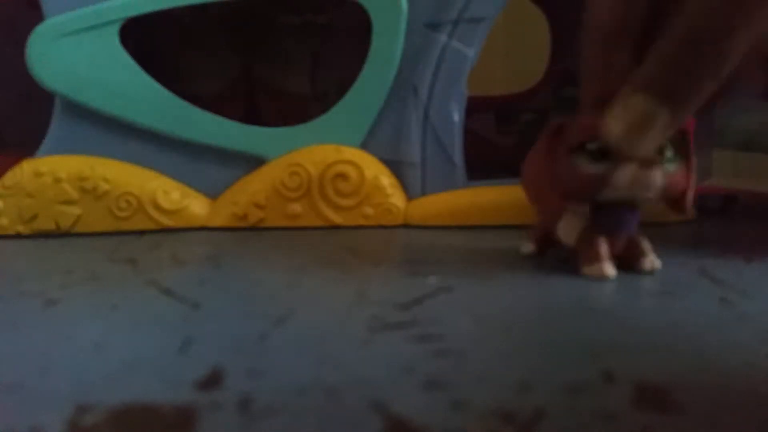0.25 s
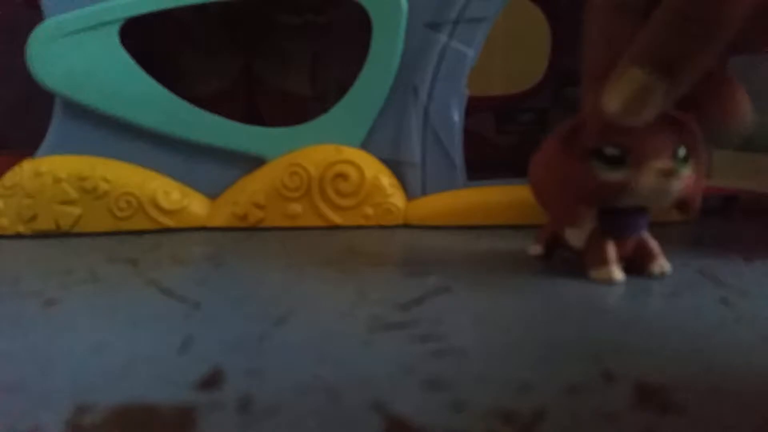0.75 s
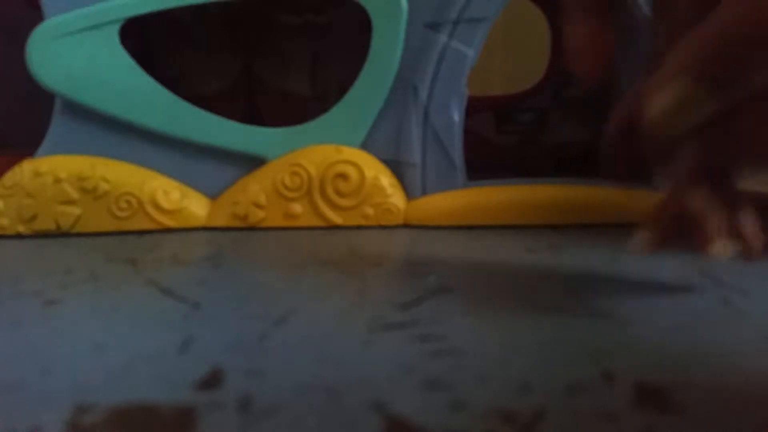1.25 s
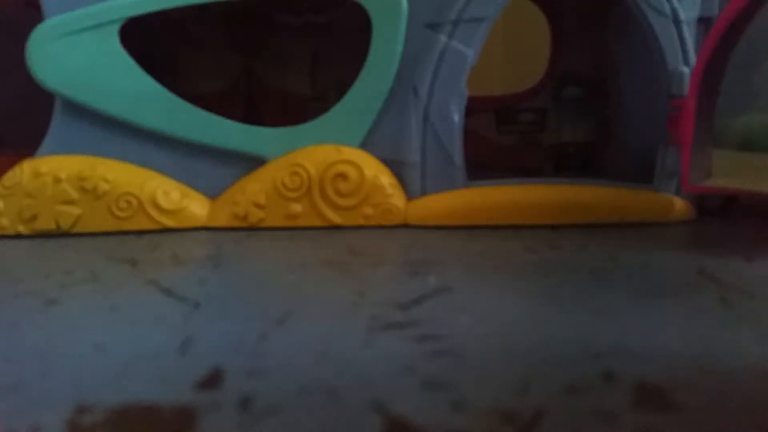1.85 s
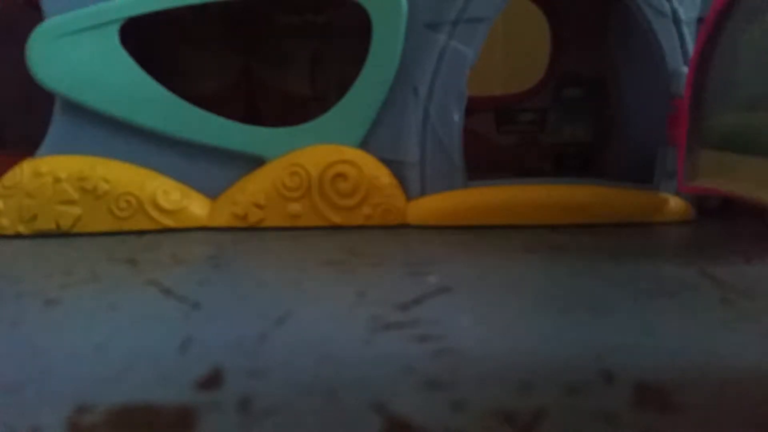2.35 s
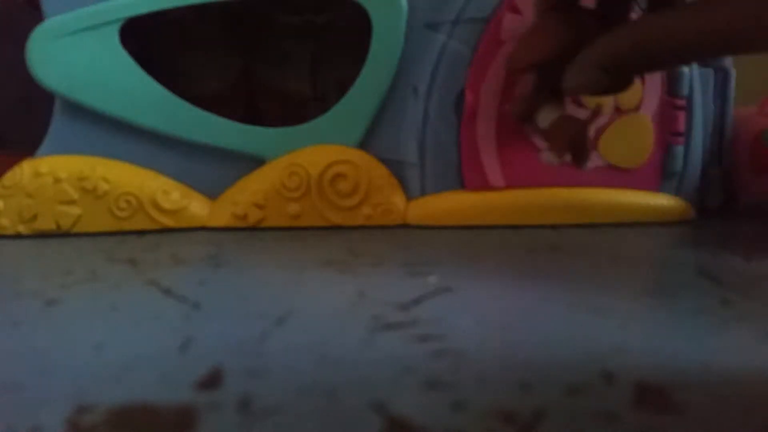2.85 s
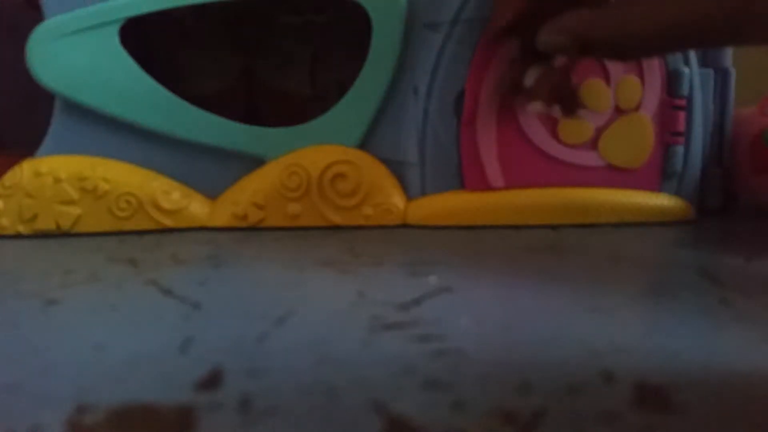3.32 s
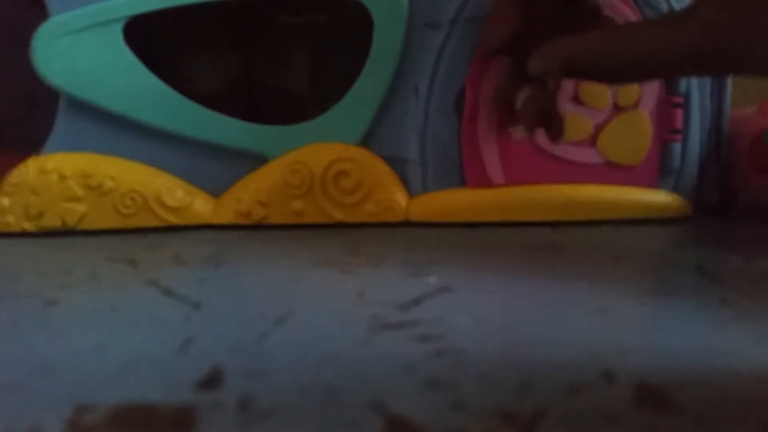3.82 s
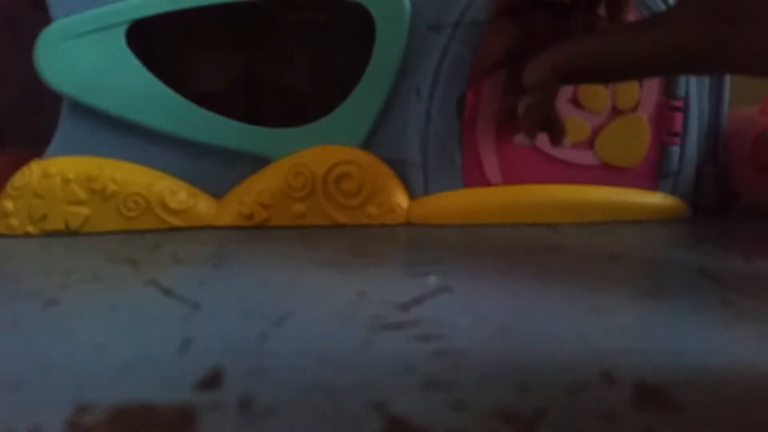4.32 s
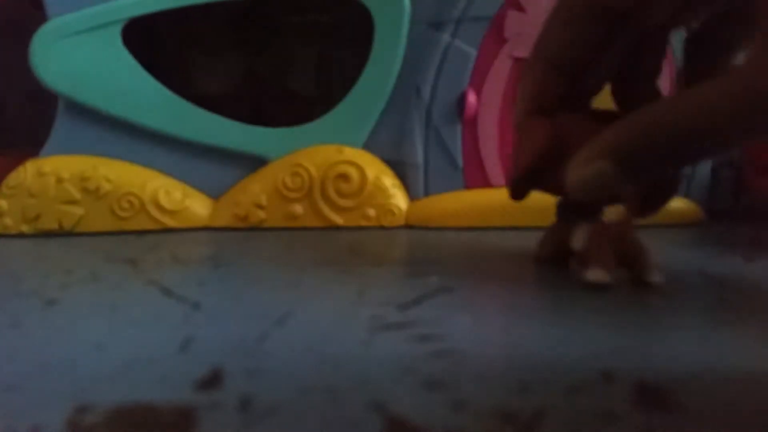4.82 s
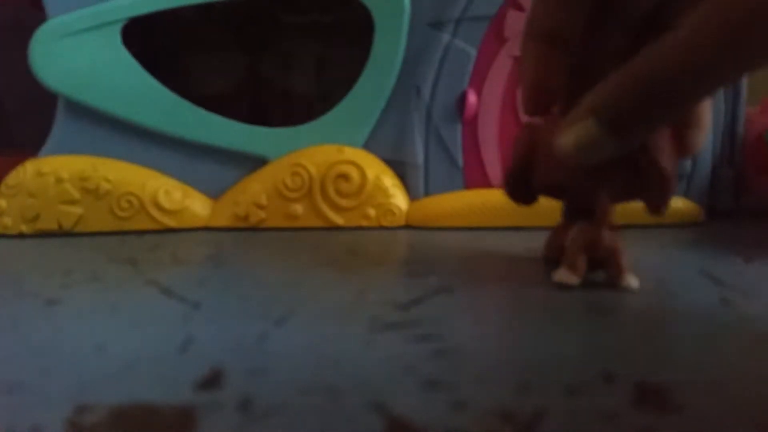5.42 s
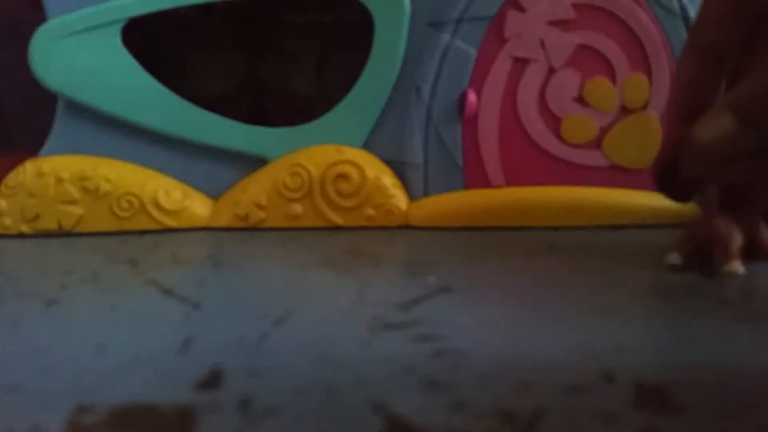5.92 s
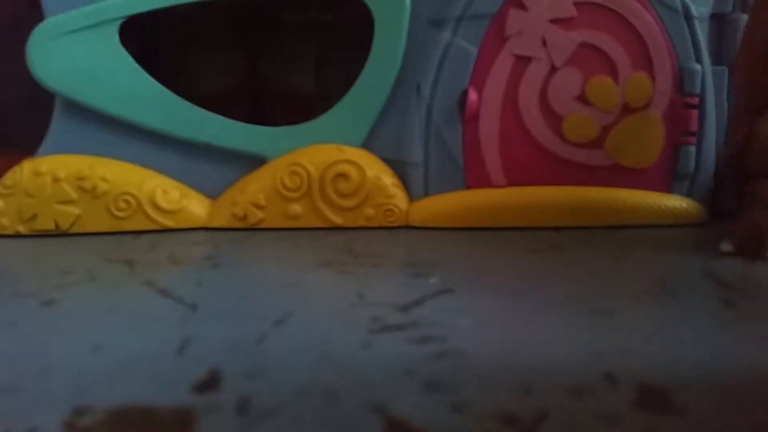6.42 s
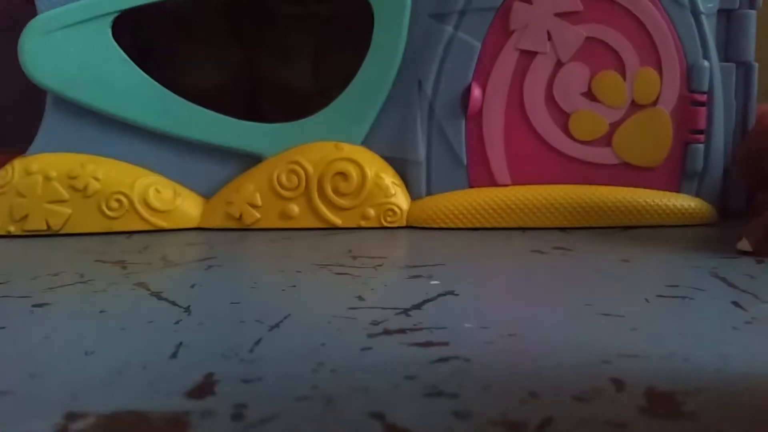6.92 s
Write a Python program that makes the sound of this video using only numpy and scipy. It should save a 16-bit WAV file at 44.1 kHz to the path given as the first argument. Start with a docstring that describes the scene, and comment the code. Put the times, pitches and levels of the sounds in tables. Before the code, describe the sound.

A small plastic toy figure is tapped down on a hollow board, then moved away with soft scrapes. A plastic playhouse door clacks shut and is knocked, sharply around the middle. The figure lands and rocks in a quickening, fading patter, then clicks and steps away. Very close stereo microphone, short room tail, quiet indoor air, and faint hiss mostly at left that swells at the end.

```python
"""Small plastic figures are set down, knocked, rocked and dragged on a hollow board close to two ports.
Each contact rings the board's low modes and the toys' short shell modes, with noise cracks and a short room tail.
A rocking toy adds blunt jolts; sliding strokes shake the same modes and rustle.
Filtered noise gives the room air, its rumble and a mostly left hiss around 4 kHz that swells at the end;
a wavering sine gives a faint low hum."""
import sys
import numpy as np
from scipy import signal
from scipy.fft import rfft, irfft, next_fast_len
from scipy.io import wavfile
from scipy.ndimage import map_coordinates

SR = 44100
rng = np.random.default_rng(int(sys.argv[2]) if len(sys.argv) > 2 else 0)


def unload_wav(signal):
    """Save mono or channel-first audio to the path in sys.argv[1] as 16-bit WAV at rate SR, clipped to [-1, 1]."""
    wavfile.write(
        sys.argv[1],
        SR,
        np.round(np.clip(np.atleast_2d(signal).T, -1, 1) * 32767).astype(np.int16),
    )


def volts(x):
    """Linear amplitude factor 10**(x/20) for a level x in dB, scalar or array-like."""
    e = np.asarray(x, float) / 20
    return 10 ** e


N = 315756


def unit(x):
    """Scaled to rms 1."""
    return x / np.sqrt(np.mean(x ** 2) + 1e-20)


def wobble(rate):
    """A smooth random curve with the given number of knots a second."""
    knots = rng.standard_normal(int(N * rate / SR) + 4)
    return map_coordinates(knots, [np.arange(N) * rate / SR])


def coloured(x, spectrum):
    """x filtered through (hz, level_db) points joined on a log axis, then set to rms 1."""
    points_hz, db = np.transpose(spectrum)
    size = next_fast_len(N + SR // 4)
    hz = np.fft.rfftfreq(size, 1 / SR)
    filter_db = np.interp(np.log(hz + 1), np.log(points_hz), db, left=-120, right=-120)
    return unit(irfft(rfft(x, size) * volts(filter_db), size)[..., :N])


def contact_rows(*columns):
    """Rows of start_s, body_db, deep_db, thump_db, knock_db, click_db, tick_db, shell_pitch_ratio."""
    return np.transpose(np.broadcast_arrays(*columns))


DEEP_DB = -4  # lowest board modes over the thump, for steps and touches

# feet of a figure on the board; the last three are over the body:
# start_s, body_db, thump_db, click_db, tick_db
FOOTSTEPS = [(0.316, -31.5, -9.5, -10.5, -28), (0.35, -14.5, -12, -15, -54),
             (0.442, -29.5, -9.5, -13.5, -39), (0.481, -26.5, -11, -13.5, -38),
             (1.475, -13, -10.5, -8.5, -32.5), (1.718, -19, -13.5, -21, -26), (1.734, -22, -7.5, 1.5, -42),
             (2.361, -24.5, -15.5, -10, -32), (2.427, -26.5, -8.5, -15, -34),
             (4.909, -21.5, -2.5, -20.5, -40), (5.759, -7, -19, -10.5, -30),
             (5.976, -17, -17, -14.5, -18.5), (5.991, -11, -12.5, -2.5, -66),
             (6.234, -20.5, -12, -13, -28.5), (6.252, -12.5, -20.5, -20, -40), (6.308, -31, -15, -8, -34),
             (6.422, -24, -7.5, -8.5, -25), (6.455, -17, -7.5, -2.5, -30.5), (6.521, -27, -17, -13.5, -30),
             (6.614, -19, -11.5, -15.5, -39), (6.647, -8, -16.5, -11.5, -42)]


def footsteps():
    """Feet land on the board; the knock partly follows the click, and a smaller second figure knocks harder."""
    second_figure_s, second_knock_db = 4.8, 4.5
    start_s, body_db, thump_db, click_db, tick_db = np.transpose(FOOTSTEPS)
    knock_db = -6.5 + 0.55 * click_db + second_knock_db * (start_s > second_figure_s)
    return contact_rows(start_s, body_db, DEEP_DB, thump_db, knock_db, click_db, tick_db, 1)


# knocks on the hollow playhouse; the last three are over the body:
# start_s, body_db, thump_db, knock_db, tick_db
PLAYHOUSE_KNOCKS = [(2.791, -39.5, -4, -0.5, -42), (2.816, -29.5, -10, -1, -41),
                    (2.844, -19, -6, 3.5, -29.5), (2.941, -17.5, -17.5, -3.5, -45),
                    (3.114, -28.5, -19.5, -3.5, -36), (3.347, -31.5, -9, -5, -22),
                    (3.768, -39.5, -24, -1.5, -48), (3.883, -36.5, 9, -14, -21),
                    (3.934, -13.5, -15, -13, -22), (3.961, -14.5, -43, -13, -49),
                    (3.97, -17.5, 0.5, -7, -28.5), (4.228, -28.5, -8.5, -7.5, -36),
                    (4.379, -40, -18, 1, -42), (4.401, -32, -7.5, -5.5, -47),
                    (4.432, -14.5, -4.5, 5.5, -11), (4.698, -22.5, 2, -10, -32)]


def playhouse_knocks():
    """The hollow playhouse is struck; its shell modes sit a little higher than a figure's."""
    click_over_knock_db, shell_pitch_ratio = -12.5, 1.1
    start_s, body_db, thump_db, knock_db, tick_db = np.transpose(PLAYHOUSE_KNOCKS)
    click_db = knock_db + click_over_knock_db
    return contact_rows(start_s, body_db, 0, thump_db, knock_db, click_db, tick_db, shell_pitch_ratio)


# bright snaps of hard plastic edges; the last three are over the body:
# start_s, body_db, thump_db, knock_db, tick_db
EDGE_SNAPS = [(0.117, -33.5, -8, -2.5, -20.5), (3.898, -28, -9, -37, 1.5), (4.059, -21.5, -9, -1, -3),
              (4.77, -29.5, -6, -16, -9), (4.872, -23.5, -12, -3.5, -21), (5.734, -26.5, -31, -1.5, -52),
              (5.804, -35.5, 4, -29.5, 1.5), (5.83, -42.5, 8.5, 4, -26), (5.857, -36, 8, -12, 3),
              (5.907, -35, 0.5, -15.5, -1), (5.957, -37.5, 7, -6, 2), (6.074, -33, -4.5, -4, -7.5)]


def edge_snaps():
    """Hard edges snap: a strong click over the body, often with strong ticks."""
    click_db = -7
    start_s, body_db, thump_db, knock_db, tick_db = np.transpose(EDGE_SNAPS)
    return contact_rows(start_s, body_db, 0, thump_db, knock_db, click_db, tick_db, 1)


# light, dull touches and small bounces; thump_db is over the body:
# start_s, body_db, thump_db
LIGHT_TOUCHES = [(0.627, -42, -1.5), (0.893, -41.5, -3.5), (0.938, -34.5, -4), (0.998, -44, -19),
                 (1.048, -34, -25), (0.693, -49.5, -22), (1.563, -34.5, -11), (1.731, -21, -7),
                 (2.021, -23.5, -15), (2.049, -29, -9.5), (2.403, -38, -15), (2.59, -30, -26),
                 (2.675, -30, -10.5), (3.267, -41, -13), (4.127, -33.5, -7.5), (4.344, -28, -13),
                 (6.719, -27.5, -8.5), (6.795, -36.5, -2.5), (6.855, -38.5, -10.5)]


def light_touches():
    """Soft contacts excite little above the body: weak knock, click and tick."""
    knock_db, click_db, tick_db = -12.5, -25.5, -39
    start_s, body_db, thump_db = np.transpose(LIGHT_TOUCHES)
    return contact_rows(start_s, body_db, DEEP_DB, thump_db, knock_db, click_db, tick_db, 1)


ROCK_DB, ROCK_FADE_DB = -15.5, -0.95  # body level of the first rocking contact, change per contact


def rocking(count=12):
    """A toy rocks from edge to edge in turn, with closing gaps, falling level and brightening tone."""
    start_s, gap_s, gap_shrinks_s, longest_gap_s = 5.0965, .0725, .0029, .068
    far_edge_db = -2
    # deep_db over the thump, then thump_db, knock_db, click_db, tick_db over the body
    near_edge = (3, -3.5, -11.5, -24, -42.5)
    far_edge = (0, -1, -5.5, -22.5, -39.5)
    gain_per_contact_db = (0.031, 0.4, 0.067, 0.76, 2.97)
    k = np.arange(count)
    far = k % 2
    gaps = np.minimum(gap_s - gap_shrinks_s * (k - 1), longest_gap_s) * (k > 0)
    body_db = ROCK_DB + ROCK_FADE_DB * k + far_edge_db * far
    tone_db = np.where(far[:, None], far_edge, near_edge) + np.outer(k, gain_per_contact_db)
    return contact_rows(start_s + np.cumsum(gaps), body_db, *tone_db.T, 1)


# resonances of board and shells, levels relative:
# pitch_hz, level_db, t60_s, left_over_right_db
TOY_MODES = [(77.45, -16, 0.59, 1), (118.9, 4.5, 0.084, -3), (145.2, -1.5, 0.11, -10),
             (175.3, 7, 0.037, 13.5), (231.7, -5, 0.27, 16), (295, -7, 0.15, 2.5), (328.9, 1.5, 0.039, 10),
             (401.8, -11, 0.12, 2.5), (493.6, -6.5, 0.041, -4.5), (569.6, -14.5, 0.084, 9.5),
             (780, -5, 0.04, 2), (923, -1, 0.028, 3.5), (1135, -11, 0.057, 0), (1418, -22, 0.06, 12),
             (1808, -7.5, 0.049, -1), (2167, -4, 0.024, 1), (2750, -9, 0.014, 15), (3620, -7.5, 0.022, 16),
             (4620, -16.5, 0.014, 25)]


def ringing(damping):
    """Each mode's decaying swing and its complex weight at the two ports, the left one ahead in phase.
    A hand on the toy adds damping, in dB per cycle."""
    hz, db, t60, lean_db = np.transpose(TOY_MODES)
    t = np.arange(SR // 2) / SR
    cycles = hz[:, None] * t
    decay = volts(-60 * t / t60[:, None] - damping * cycles)
    onset = (1 - np.exp(-cycles / 0.4)) ** 2
    swing = decay * np.exp(2j * np.pi * cycles) * onset
    phase = 1.4 * np.array([[.5], [-.5]])  # radians
    ports = volts(db + np.outer([.5, -.5], lean_db)) * np.exp(1j * phase)
    return hz, swing, ports


# noise bands of a contact, levels over its knock, click, click/tick mean and tick in turn:
# low_hz, high_hz, crack_db, crack_t60_s, room_db, room_t60_s, left_over_right_db
CRACK_BANDS = [(290, 1300, -8.5, 0.03, -15.5, 0.18, 1), (1660, 3560, -11, 0.042, -31.5, 0.44, 10.5),
               (4160, 5510, -22, 0.067, -40.5, 0.79, 24.5), (10370, 21800, -4.5, 0.032, -19, 0.28, 0)]


def blows():
    """Every contact rings the modes at new strengths, weighted by its hardness, and cracks in four bands."""
    board_hz, shell_hz = 260, 1300  # board modes lie below the first, shell modes above the second
    detune = .03  # pitch spread from one contact spot to the next
    rattle_after_s = .02
    hz, swing, ports = ringing(damping=0)
    board, shell = hz < board_hz, hz >= shell_hz
    middle = ~board & ~shell
    t = np.arange(SR // 2) / SR
    rings, bursts = np.zeros((2, N + SR)), np.zeros((len(CRACK_BANDS), N + SR))
    fades = np.array([volts(db - 60 * t / t60) + volts(room_db - 60 * t / room_t60)
                      for _, _, db, t60, room_db, room_t60, _ in CRACK_BANDS])
    rows = np.vstack([rocking(), footsteps(), playhouse_knocks(), edge_snaps(), light_touches()])
    rattle_db = np.r_[4.5 * wobble(70), np.zeros(SR)]
    chance = rng.standard_normal((len(rows), 3, len(hz)))
    for row, (size, *turn) in zip(rows, chance):
        start_s, body_db, deep_db, thump_db, knock_db, click_db, tick_db, pitch = row
        first = round(start_s * SR)
        at = slice(first, first + len(t))
        weight_db = np.interp(
            np.log(hz), np.log([190, 228, 260, 400, 600, 813, 1400, 1760]),
            [thump_db + deep_db, thump_db, thump_db, 0, 0, knock_db, knock_db, click_db])
        struck = ports * volts(body_db + weight_db + 2.5 * size) * np.exp(.4j * np.array(turn))
        # loose plastic rings unevenly once the blow is over, the board half as much in dB
        rattle = volts(rattle_db[at] * np.minimum(t / rattle_after_s, 1))
        rings[:, at] += np.sqrt(rattle) * (struck[:, board] @ swing[board]).imag
        for part, stretch in ((middle, 1 + detune * size[0]), (shell, pitch + detune * size[1])):
            ring = (struck[:, part] @ swing[part]).imag
            rings[:, at] += rattle * np.array([np.interp(t * stretch, t, port) for port in ring])
        band_db = np.c_[[knock_db, click_db, (click_db + tick_db) / 2, tick_db]]
        bursts[:, at] += volts(body_db + band_db) * fades
    crunch = unit(volts(3 * wobble(900) + 1.2 * wobble(150)))  # rough plastic cracks in millisecond grains
    for burst, (low_hz, high_hz, *_, lean_db) in zip(bursts[:, :N], CRACK_BANDS):
        band = signal.butter(N=3, Wn=[low_hz, high_hz], btype="band", fs=SR, output="sos")
        # about rms 1 once band-limited
        noise = rng.standard_normal((2, N)) * np.sqrt(SR / 2 / (high_hz - low_hz))
        crack = signal.sosfilt(band, burst * crunch * noise)
        rings[:, :N] += volts(np.c_[[lean_db / 2, -lean_db / 2]]) * crack
    return rings[:, :N]


def rocking_jolts():
    """Each rocking edge lands with one blunt pulse, dipping either side, alike at both ports."""
    push_db, push_s = 2, .0006  # over the near edge's body, pulse width
    t = np.arange(SR // 20) / SR
    u = t / push_s - 4.5
    pulse = (1 - u * u) * np.exp(-u * u / 2)
    out = np.zeros((2, N))
    for k, (start_s, *_) in enumerate(rocking()):
        first = round(start_s * SR)
        out[:, first:first + len(t)] += volts(ROCK_DB + ROCK_FADE_DB * k + push_db) * pulse
    return out


# thin ticks near the right port, level of the noise at its start before the high-pass:
# start_s, level_db
THIN_TICKS = [(5.098, -28), (5.233, -42)]


def thin_ticks():
    """Decaying noise, high-passed until only a thin tick is left, almost all at the right."""
    low_edge_hz, t60_s, left_over_right_db = 12000, 0.025, -36
    t = np.arange(SR // 20) / SR
    band = signal.butter(N=4, Wn=low_edge_hz, btype="high", fs=SR, output="sos")
    out = np.zeros((2, N))
    for start_s, db in THIN_TICKS:
        tick = signal.sosfilt(band, rng.standard_normal(len(t)) * volts(db - 60 * t / t60_s))
        first = round(start_s * SR)
        out[:, first:first + len(t)] += volts([[left_over_right_db], [0]]) * tick
    return out


# rubbing strokes, levels before the stroke's shape, rustle also before its port gains:
# start_s, end_s, level_db, strongest_hz, rustle_db
STROKES = [(-.05, 0.078, -51, 730, -75), (0.13, 0.224, -39.5, 80, -87), (0.57, 0.7, -51, 303, -91),
           (0.864, 1.094, -48.5, 400, -101), (1.152, 1.315, -47.5, 292, -103),
           (2.352, 2.514, -38.5, 490, -74.5), (2.569, 2.743, -41, 430, -83),
           (3.226, 3.444, -44.5, 770, -87), (3.645, 3.8, -54.5, 597, -88), (3.878, 3.98, -21, 250, -53.5),
           (3.901, 4.045, -31, 1110, -75), (4.66, 4.798, -34.5, 406, -69), (4.695, 6.166, -39.5, 640, -73),
           (4.985, 5.11, -46, 580, -69.5), (5.69, 6.156, -37, 326, -87.5), (6.684, 6.755, -46, 456, -75),
           (6.81, 6.978, -41.5, 235, -78.5)]
# tone of the fine rustle, relative:
# pitch_hz, level_db_per_hz
RUSTLE_COLOUR = [(5500, -82), (6600, -14), (8500, -34), (12500, -11), (15900, -23.5)]


def dragging():
    """Sliding feet and fingers: clumped grains shake the same modes, with a fine rustle on top."""
    hz, swing, ports = ringing(damping=1.6)
    grains = rng.standard_normal(N) * volts(2 * wobble(45) + 3.8 * wobble(400))
    clumps = volts(3 * wobble(40) + 4 * wobble(330))
    fine = coloured(rng.standard_normal((2, N)) * clumps, RUSTLE_COLOUR)
    rub, rustle = np.zeros((2, N + SR)), np.zeros(N)
    for start_s, end_s, db, strongest_hz, rustle_db in STROKES:
        a, b = round(max(start_s, 0) * SR), round(end_s * SR)
        u = (np.arange(a, b) / SR - start_s) / (end_s - start_s)
        stroke = abs(np.sin(np.pi * u)) ** .5 * abs(1 - u ** 3)  # quick to start, easing off
        tilt = volts(-4.5 * abs(np.log2(hz / strongest_hz)))  # 4.5 dB weaker per octave away
        body = ((ports * tilt) @ swing).imag
        push = stroke * unit(grains[a:b])
        shaken = signal.fftconvolve(push[None], body / np.linalg.norm(body), axes=1)
        rub[:, a:a + shaken.shape[1]] += volts(db) * shaken
        rustle[a:b] += volts(rustle_db) * stroke
    return rub[:, :N] + rustle * volts([[-.5], [5]]) * fine


# steady hiss tone, relative:
# pitch_hz, level_db_per_hz
HISS_TONE = [(1500, -15), (2100, -3.5), (2900, -11.5), (3900, 6.5), (4500, -9), (5050, 3), (5500, -10),
             (5900, -48)]
# level of the added hiss, before the port gains:
# time_s, level_db
HISS_SWELL = [(6.33, -71), (6.4, -55), (6.95, -50.5), (7.16, -54)]
# tone of the added hiss, relative:
# pitch_hz, level_db_per_hz
HISS_SWELL_TONE = [(2200, -42), (2700, -13), (3400, -7), (3950, 3), (4600, -11), (5300, -10.5), (6100, -57)]


def left_hiss():
    """Coloured noise around 4 kHz, strong at the left port and faint at the right, swelling at the end."""
    time_s, level_db = np.transpose(HISS_SWELL)
    swell = volts(np.interp(np.arange(N) / SR, time_s, level_db))
    hiss = volts(-66 + 0.25 * wobble(28)) * coloured(rng.standard_normal(N), HISS_TONE)
    hiss += swell * coloured(rng.standard_normal(N), HISS_SWELL_TONE)
    return volts([[6], [-24]]) * hiss


def hum():
    """A faint 130 Hz sine whose level and phase waver."""
    phase = 2 * np.pi * 130.0 * np.arange(N) / SR + 0.16 * wobble(1.9)
    return volts(-61.5 + 2.6 * wobble(17)) * np.sin(phase)


# tone of the room air, relative:
# pitch_hz, level_db_per_hz
AIR_TONE = [(25, -22), (55, -16), (150, -10.5), (700, -24.5), (5300, -42.5), (5950, -52), (6700, -43.5),
            (9000, -62.5), (13000, -40.5), (15900, -43.5)]


def room_air():
    """Separate coloured noise at each port, plus a bass rumble common to both."""
    rumble_tone = [(25, -30.0), (55, -9.0), (130, -23.0), (220, -31.5)]  # pitch_hz, level_db_per_hz
    rumble = volts(-60.0) * coloured(rng.standard_normal(N), rumble_tone)
    return volts([[-62], [-64]]) * coloured(rng.standard_normal((2, N)), AIR_TONE) + rumble


def scene():
    """Everything at the two ports."""
    return blows() + rocking_jolts() + thin_ticks() + dragging() + left_hiss() + hum() + room_air()


def low_pass(x):
    """Removes everything above the highest recorded frequency."""
    return signal.sosfilt(signal.butter(12, 16830, fs=SR, output="sos"), x)


def record(dry):
    """The microphones lose the deepest bass and the top."""
    low_cut = signal.butter(N=3, Wn=50, btype="high", fs=SR, output="sos")
    high_cut = signal.butter(N=12, Wn=15900, fs=SR, output="sos")
    mix = signal.sosfilt(np.vstack([low_cut, high_cut]), dry)
    return low_pass(mix)


dry = scene()
out = record(dry)
unload_wav(out)
```